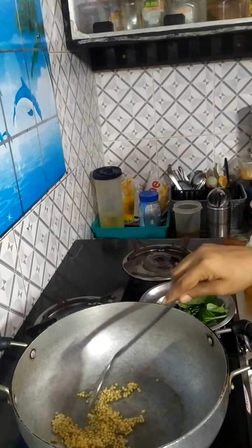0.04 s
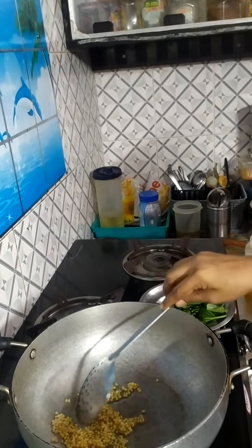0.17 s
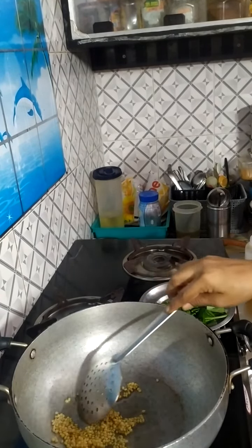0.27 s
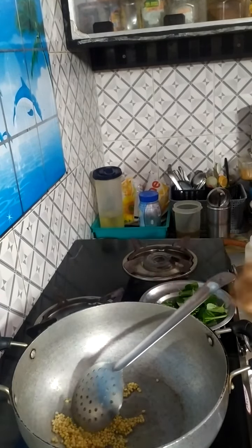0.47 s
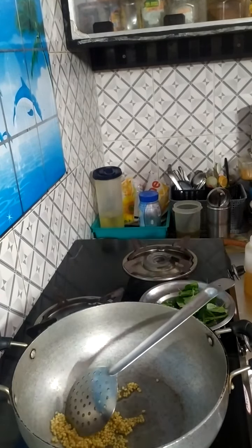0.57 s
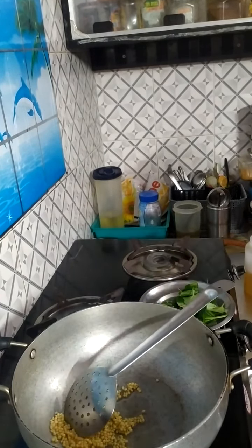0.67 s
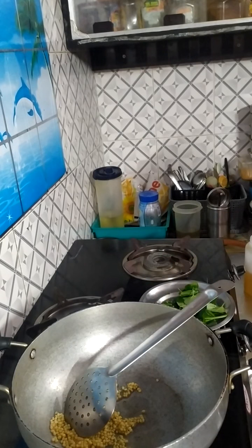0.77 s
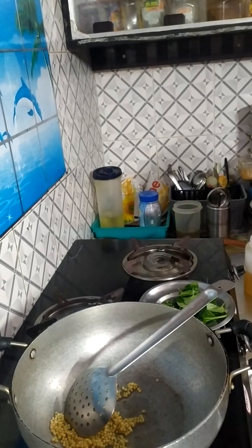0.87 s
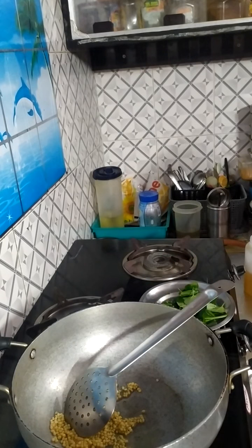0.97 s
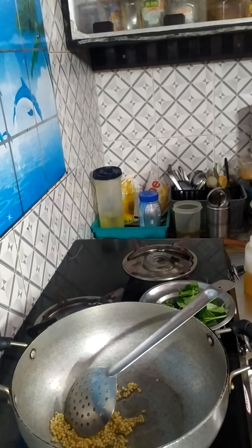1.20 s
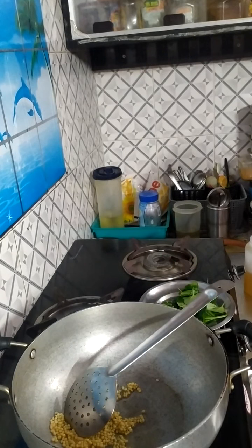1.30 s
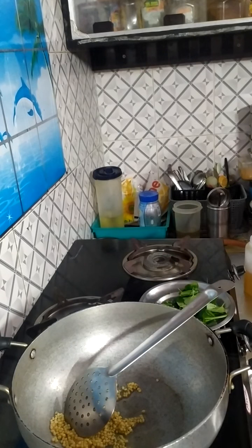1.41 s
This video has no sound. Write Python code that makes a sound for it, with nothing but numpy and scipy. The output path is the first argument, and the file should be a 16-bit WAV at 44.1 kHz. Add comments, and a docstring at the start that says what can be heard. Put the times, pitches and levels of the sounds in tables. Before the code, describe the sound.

A metal ladle knocks and clatters against a thin metal pan, then settles over faint fan hum

```python
"""A small tiled kitchen: a perforated metal ladle ends a stir in a wide thin pan with a light touch and a knock,
then it is dropped and chatters on the rim until it settles; a few faint touches follow.
Clusters of clicks ring the modes of pan and ladle, and soft pushes boom in the stove top.
Behind them a fan motor hums (sines, a narrow whine, moving air) and oil hisses faintly (banded noise).
Feedback delays give the metal and the stove a short room."""
import sys
import numpy as np
from scipy import signal
from scipy.fft import rfft, irfft, next_fast_len
from scipy.io import wavfile

SR = 44100
rng = np.random.default_rng(int(sys.argv[2]) if len(sys.argv) > 2 else 0)


def volts(x):
    """Linear amplitude factor 10**(x/20) for a level x in dB, scalar or array-like."""
    e = np.asarray(x, float) / 20
    return 10 ** e


def to_wav(sig):
    """Store sig (one row per channel, or 1-D mono) as 16-bit WAV at the path in sys.argv[1].

    Samples outside -1..1 are clipped; the rate is SR.
    """
    pcm = np.clip(np.atleast_2d(sig), -1, 1) * 32767
    pcm = np.round(pcm).astype(np.int16)
    wavfile.write(sys.argv[1], SR, pcm.T)  # frames by channels


N = 63945   # samples in the scene


def rms_one(x):
    """Scale to rms 1."""
    return x / np.sqrt(np.mean(x ** 2) + 1e-20)


def at_hz(points, hz):
    """Read the level of a (pitch, level) table on a log pitch axis."""
    table = np.array(points)
    return np.interp(np.log(hz), np.log(table[:, 0]), table[:, 1])


def drift(rate_hz):
    """Slow random movement of rms 1: noise through a two-pole lowpass, worked out every 40 samples."""
    pole = np.exp(-80 * np.pi * rate_hz / SR)
    noise = rng.standard_normal(N // 40 + 2002)
    slow = signal.lfilter([1], [1, -2 * pole, pole ** 2], noise)[2000:]   # skip the filter's start
    return np.interp(np.arange(N) / 40, np.arange(len(slow)), rms_one(slow))


def ring(clicks, hz, t60):
    """A two-pole resonator: a unit click sets a decaying sine of height 1 ringing."""
    radius, turn = volts(-60 / (t60 * SR)), 2 * np.pi * hz / SR
    return signal.lfilter([0, np.sin(turn)], [1, -2 * radius * np.cos(turn), radius ** 2], clicks + 1e-18)


def band(x, low_hz, high_hz):
    """Keep one band of pitches with a Butterworth filter."""
    return signal.sosfilt(signal.butter(2, [low_hz, high_hz], "band", fs=SR, output="sos"), x)


# how alike left and right are in the noises: (pitch [Hz], likeness [1 = same, 0 = unrelated])
NOISE_LIKENESS = [(25, .7), (60, 0.94), (240, 0.15), (950, 0.31), (3770, 0.05), (15000, 0.04)]


def banded_noise(spectrum, flicker_db):
    """Third-octave bands of stereo noise, each with its own level, flicker and likeness; rms 1."""
    edges = 25 * 2 ** (np.arange(29) / 3)
    white = rng.standard_normal((2, 2, N))   # neighbouring bands take turns with two stereo noises
    out = 0
    for k, (low, high) in enumerate(zip(edges, edges[1:])):
        hz = np.sqrt(low * high)
        if spectrum[0][0] <= hz <= spectrum[-1][0]:
            mid, side = band(white[k % 2], low, high)
            alike = np.clip(at_hz(NOISE_LIKENESS, hz), -1, 1)
            stereo = np.sqrt(1 + alike) * mid + np.sqrt(1 - alike) * side * [[1], [-1]]
            out = out + volts(at_hz(spectrum, hz) + flicker_db * drift(4.7)) * stereo
    return rms_one(out)


# contacts of ladle and pan: (time [s], chatter length [s], force level [dB],
# lift of the ladle and equal cut of the pan [dB], low cut [Hz], high cut [Hz])
CONTACTS_LADLE_ON_PAN = [(0.0, 0.0079, -33.5, -1, 3540, 16400), (0.01, 0.024, -41, -1.5, 3720, 14300),
                         (0.1734, 0.0037, -20.5, 1.5, 6130, 14900), (0.2364, 0.0068, -8, 7.5, 603, 11500),
                         (0.247, 0.04, -27.5, 4, 1280, 11400), (0.355, 0.12, -38.5, -5, 891, 13300),
                         (0.3835, 0.0048, -4, 0.5, 790, 13900), (0.392, 0.0092, -7.5, -3, 800, 14900),
                         (0.407, .013, -9, 2.5, 680, 14900), (0.422, 0.022, -18, 1, 611, 13540),
                         (0.442, 0.0077, -12.5, -12, 2500, 12660), (0.4491, .007, -15.5, 7, 1500, 11920),
                         (0.458, 0.037, -20.5, -4, 1140, 12160), (0.514, 0.083, -31.5, -6, 470, 6000),
                         (0.601, 0.047, -35.5, -3.5, 518, 7300), (0.632, 0.014, -38.5, 1, 1110, 6700),
                         (.911, 0.0024, -37.5, -3.5, 1800, 5980), (1.305, 0.0039, -47, -6, 1700, 12100),
                         (1.375, 0.038, -51, -6.5, 1130, 14100), (1.392, 0.002, -32, 5.5, 2430, 4730),
                         (1.402, 0.0032, -38, 10, 1990, 9000), (1.408, 0.014, -52, -5, 1380, 12100)]
TOUCHES_PER_S, TOUCH_SPREAD_DB, RISE_S = 3000, 2.5, 0.0019
CHATTER_UNEVEN_DB, CHATTER_UNEVEN_HZ = 3.5, 110


def contact_forces():
    """Each contact is a chatter of uneven clicks that rises fast and fades over its length."""
    sizes = volts(TOUCH_SPREAD_DB * np.minimum(rng.exponential(1, N), 4)) * rng.choice([-1, 1], N)
    touching = rng.random(N) < TOUCHES_PER_S / SR
    clicks = rms_one(volts(CHATTER_UNEVEN_DB * drift(CHATTER_UNEVEN_HZ)) * sizes * touching)
    age = np.arange(SR // 5) / SR
    forces = []
    for start, length, db, _, low_hz, high_hz in CONTACTS_LADLE_ON_PAN:
        shape = (1 - np.exp(-age / RISE_S)) * np.exp(-(age / length) ** 2)
        touches = np.roll(clicks, -int(start * SR))[:len(age)] * shape
        # the same energy whichever clicks fall inside the shape
        even = np.linalg.norm(shape) / np.linalg.norm(touches)
        forces.append(volts(db) * even * band(touches, low_hz, high_hz))
    return np.array(forces)


# strong modes of the thin pan: (pitch [Hz], relative level [dB], ring time t60 [s])
PAN_MODES = [(560, -12, .15), (630, -10, .12), (947, -8, .08), (1167, -8, .12), (1215, -1, .13),
             (1260, -6, .1), (2306, -8, .12), (4855, -1, .055), (5095, -4, .07), (5375, -2, .07),
             (5803, -8, .09), (6088, -6, .08), (7950, -6, .07), (8419, -10, .08), (9254, -8, .09),
             (10600, -4, .09), (11680, -3, .09), (12640, -5, .11), (13390, -8, .09), (14140, -8, .1),
             (14620, -9, .1)]
# strong modes of the ladle: (pitch [Hz], relative level [dB], ring time t60 [s])
LADLE_MODES = [(770, -9, .06), (1860, -10, .07), (3010, 0, .035), (3087, -1, .035), (3150, 1, .03),
               (4382, -10, .05), (5443, -16, .05), (6713, -5, .06), (7012, -5, .08), (7472, -8, .07),
               (8613, -11, .06), (9480, -6, .08), (12080, -7, .06)]
# the many close modes of thin metal: (pitch [Hz], relative level [dB])
CROWD_SPECTRUM = [(520, -40.5), (700, -8.5), (1200, -22), (1540, -21), (2500, -15.5), (3060, -12),
                  (3900, -10.5), (5000, -7.5), (8150, -2.5), (12500, -7.5), (15800, -10.5)]
PAN_DB, LADLE_DB, CROWD_DB = -37.5, -36.5, -39.5
CROWD_T60_S, CROWD_T60_SLOPE = 0.08, -0.5   # t60 at 3 kHz, power of pitch
CRACK_DB = -50   # the bare click, without ringing
STRENGTH_SPREAD_DB, SIDE_SPREAD_DB = 2, 2   # per contact and mode; again for each side
SIDE_PHASE_RAD, SIDES_APART_HZ = 3.55, 900   # left-right phase spread, full above this pitch
STRONG_MODE_TURN = 0.45   # share of that spread for the strong modes
METAL_FROM_HZ = 510   # thin metal radiates little below this


def metal():
    """Each contact rings pan, ladle and the crowd of small modes, with its own strengths and stereo phases."""
    forces = contact_forces()
    # even steps in the root of pitch, each a little off
    pitches = np.linspace(np.sqrt(540), np.sqrt(15800), 320) ** 2 * rng.uniform(.995, 1.005, 320)
    crowd = [(hz, at_hz(CROWD_SPECTRUM, hz), CROWD_T60_S * (hz / 3000) ** CROWD_T60_SLOPE) for hz in pitches]
    hz, db, t60 = np.transpose(PAN_MODES + LADLE_MODES + crowd)
    counts = [len(PAN_MODES), len(LADLE_MODES), len(crowd)]
    group_db = np.repeat([PAN_DB, LADLE_DB, CROWD_DB], counts)
    share_db = np.array(CONTACTS_LADLE_ON_PAN)[:, 3:4] * np.repeat([-1, 1, 0], counts)
    spread_db = STRENGTH_SPREAD_DB * rng.standard_normal(share_db.shape)
    strength = volts(db + group_db + share_db + spread_db)
    turn = SIDE_PHASE_RAD * np.minimum(hz / SIDES_APART_HZ, 1) * rng.standard_normal(strength.shape)
    turn[:, :counts[0] + counts[1]] *= STRONG_MODE_TURN

    age = np.arange(SR // 6) / SR
    swing = np.exp(np.outer(2j * np.pi * hz - np.log(1000) / t60, age))   # every mode, decaying
    out = np.zeros((2, N + SR))
    for side, sign in zip(out, (.5, -.5)):
        side_gain = volts(SIDE_SPREAD_DB * rng.standard_normal(strength.shape))
        heard = strength * side_gain * np.exp(1j * sign * turn)
        rings = (heard @ swing).imag
        rings[:, 0] += volts(CRACK_DB)
        sounds = signal.fftconvolve(forces, rings, axes=1)
        for (start, *_), sound in zip(CONTACTS_LADLE_ON_PAN, sounds):
            first = int(start * SR)
            side[first:first + len(sound)] += sound
    return signal.sosfilt(signal.butter(6, METAL_FROM_HZ, "high", fs=SR, output="sos"), out[:, :N])


MOTOR_HZ = 47.36
# motor hum: (multiple of the motor pitch, rms level before the trim HUM_DB [dB])
HUM_ORDERS = [(1, -69), (4, -70), (5, -63), (7, -69), (10, -62), (13, -70), (15, -75), (20, -75)]
HUM_DB, HUM_WAVER_DB = -1.5, 1.8
WHINE_HZ, WHINE_T60_S, WHINE_DB = 503.5, 2.7 / 49, -58   # a short t60 makes a wider whine
# air moved by the fan: (pitch [Hz], relative level [dB])
AIR_SPECTRUM = [(18, -29.5), (30, -8), (122, -8), (158, -17), (238, -7.5), (385, -9.5), (481, -3),
                (655, -13.5), (971, -19.5), (1800, -43), (2340, -72), (3960, -120)]
AIR_DB = -54


def fan():
    """Wavering sines at multiples of the motor pitch, noise through a resonator as whine, and moving air."""
    t = np.arange(N) / SR
    hum = 0
    for order, db in HUM_ORDERS:
        level = volts(db + HUM_DB + HUM_WAVER_DB * drift(6))
        hum = hum + level * np.sqrt(2) * np.sin(2 * np.pi * (order * MOTOR_HZ * t + rng.random()))
    whine = rms_one(ring(rng.standard_normal(N), WHINE_HZ, WHINE_T60_S))
    air = banded_noise(AIR_SPECTRUM, flicker_db=3.0)
    return hum + volts(WHINE_DB) * whine + volts(AIR_DB) * air


# hiss of the oil: (pitch [Hz], relative level [dB])
OIL_SPECTRUM = [(1200, -3), (1930, -4.5), (2650, -1.5), (3660, -4.5), (5000, -3.5), (7000, -11.5),
                (9800, -3), (12500, -7), (16000, -19.5)]
OIL_DB = -61


def oil():
    """Faint hiss: noise whose bands flicker independently."""
    return volts(OIL_DB) * banded_noise(OIL_SPECTRUM, flicker_db=3.06)


ROOM_T60_S, WALL_CUT_HZ = 0.28, 20200   # t60 in the bass; it has halved at the wall cut


def kitchen(x):
    """Reflections between tiled walls: eight feedback delays a side, duller on every round."""
    size = next_fast_len(N + SR // 4)
    hz = np.fft.rfftfreq(size, 1 / SR)
    loss = 1 + (hz / WALL_CUT_HZ) ** 2
    out = []
    for channel in x:
        echoes = 0
        for k, lag in enumerate(rng.uniform(0.0099, 0.035, 8)):   # seconds
            loop = volts(-60 * lag * loss / ROOM_T60_S) * np.exp(-2j * np.pi * hz * lag)
            echoes = echoes + (-1) ** k * loop / (1 - loop)   # all rounds of one delay
        out.append(irfft(rfft(channel, size) * echoes, size)[:N])
    return np.array(out)


# modes of the stove top: (pitch [Hz], relative level [dB], ring time t60 [s])
STOVE_MODES = [(84.4, -9.5, 0.33), (119.1, -10.5, 0.49), (199, -11.5, 0.053), (231, -8, 0.21),
               (294.9, 3, 0.2)]
# the pan rocks on the stand: (time [s], push level [dB])
PAN_ROCKS = [(0.253, -38.5), (0.389, -34.5), (0.411, -28), (.45, -30), (0.532, -40.5), (0.601, -40),
             (.66, -44.5)]
THUD_S = 0.0015   # half-width of a push


def stand():
    """The rocking pan gives soft pushes that set the stove top booming."""
    t = np.arange(N) / SR
    push = sum(volts(db) * np.exp(-((t - s) / THUD_S) ** 2) for s, db in PAN_ROCKS)
    jolt = np.gradient(push)
    return sum(volts(db) * ring(jolt, hz, t60) for hz, db, t60 in STOVE_MODES)


LEFT_DB = 0.87   # metal raised this much on the left, lowered as much on the right
ROOM_DB, BOOM_DRY = -12, 0.74   # BOOM_DRY: share of the boom kept out of the room


def scene():
    """Metal and stove with their room, over fan and oil."""
    boom = stand()
    near = metal() * volts(np.array([[LEFT_DB], [-LEFT_DB]])) + boom
    room = volts(ROOM_DB) * kitchen(near - BOOM_DRY * boom)
    return near + room + fan() + oil()


def top_cut(x):
    """Nothing passes above the cut-off."""
    return signal.sosfilt(signal.butter(12, 16660, fs=SR, output="sos"), x)


def record(dry):
    """The bass is cut below 40 Hz and peaks are rounded."""
    thin = signal.sosfilt(signal.butter(2, 40, "high", fs=SR, output="sos"), dry)
    mix = np.tanh(thin)
    return top_cut(mix)


dry = scene()
out = record(dry)
to_wav(out)
```